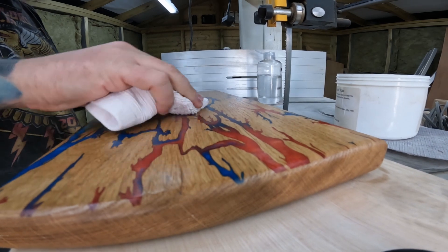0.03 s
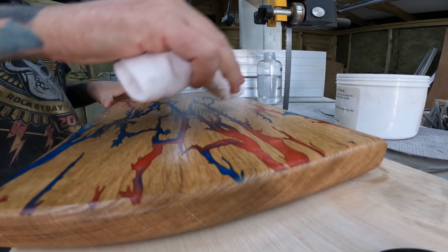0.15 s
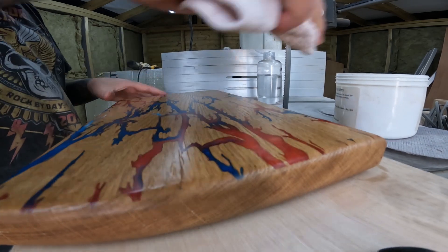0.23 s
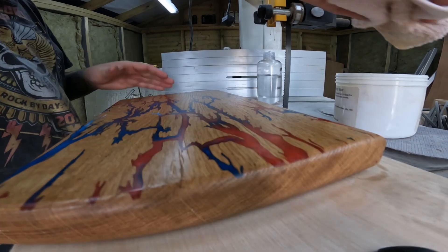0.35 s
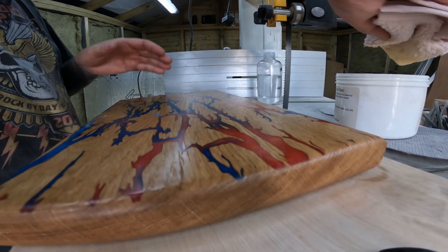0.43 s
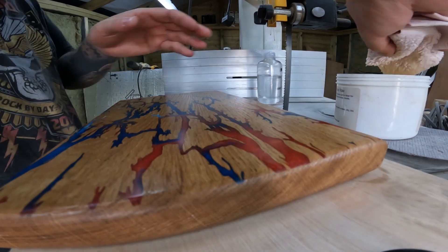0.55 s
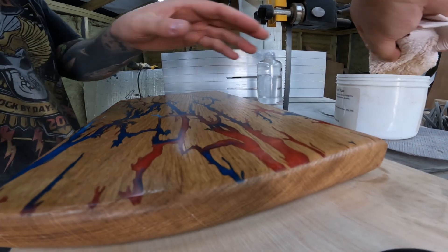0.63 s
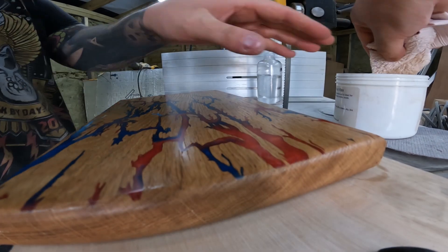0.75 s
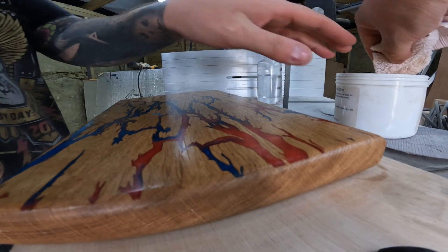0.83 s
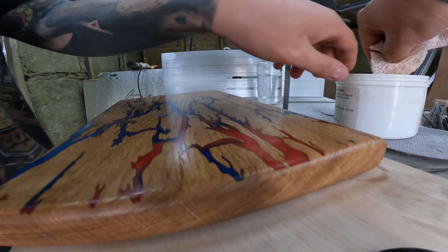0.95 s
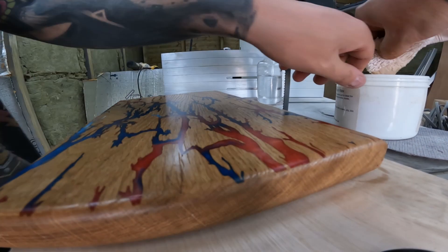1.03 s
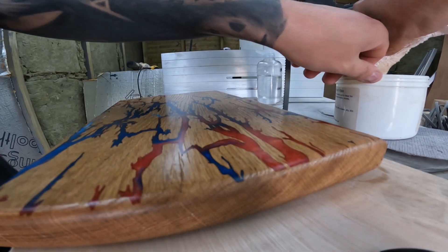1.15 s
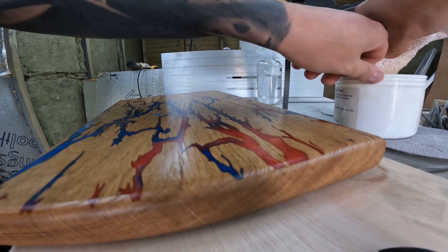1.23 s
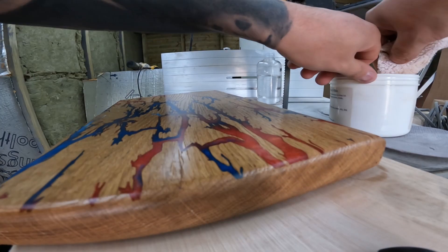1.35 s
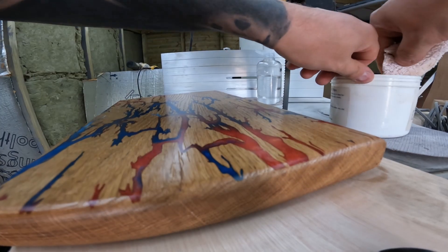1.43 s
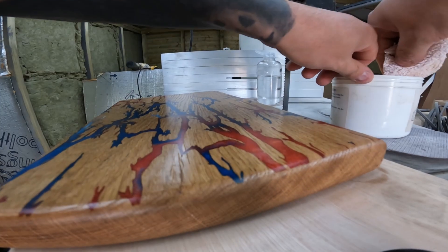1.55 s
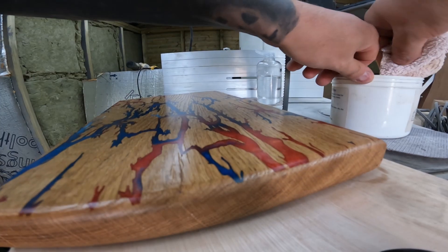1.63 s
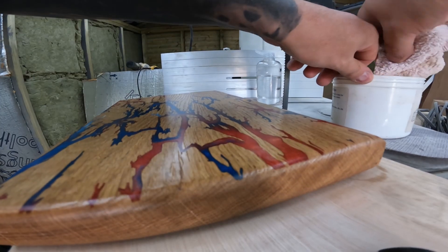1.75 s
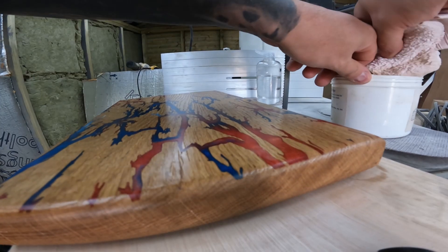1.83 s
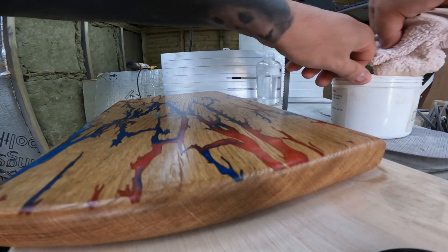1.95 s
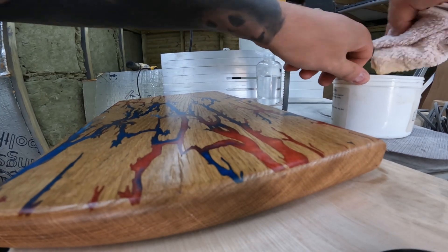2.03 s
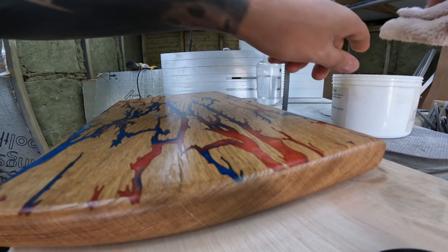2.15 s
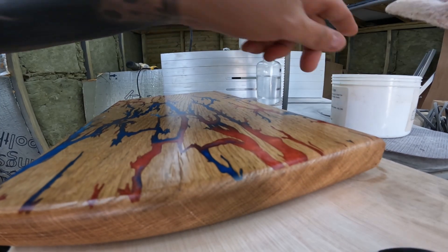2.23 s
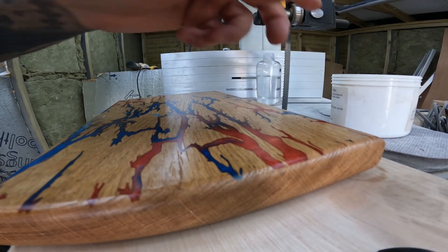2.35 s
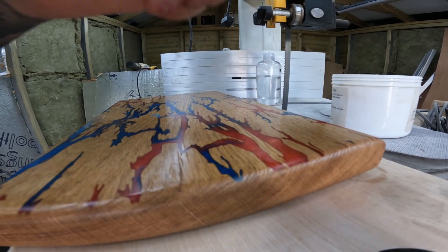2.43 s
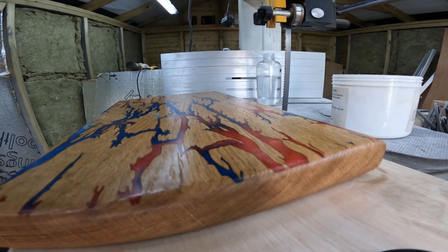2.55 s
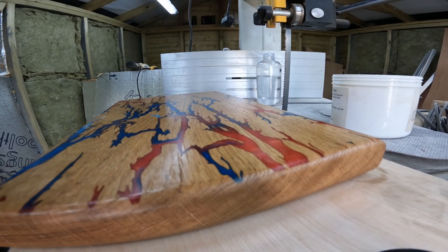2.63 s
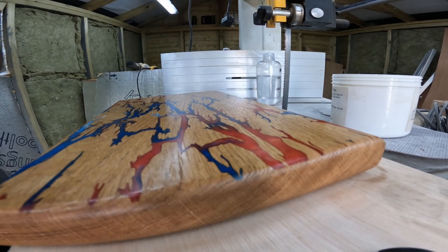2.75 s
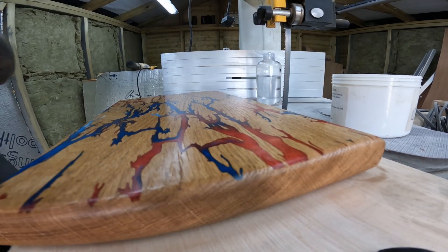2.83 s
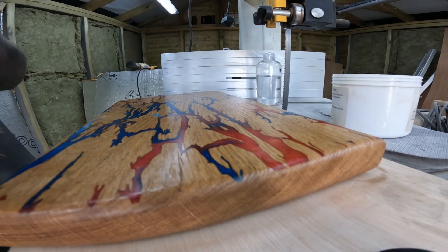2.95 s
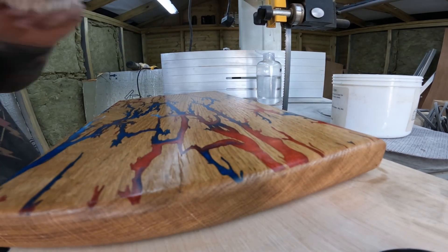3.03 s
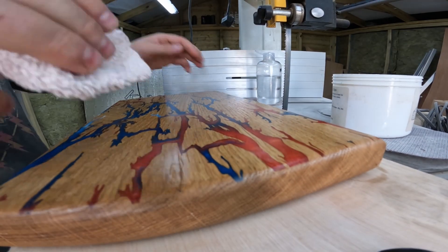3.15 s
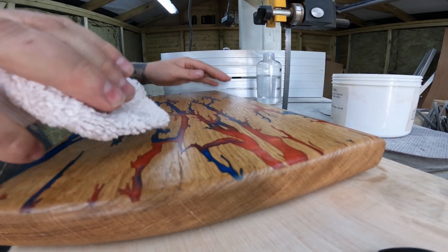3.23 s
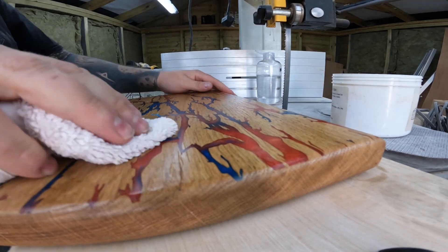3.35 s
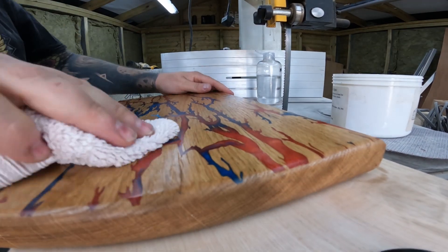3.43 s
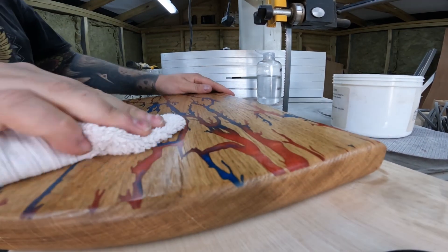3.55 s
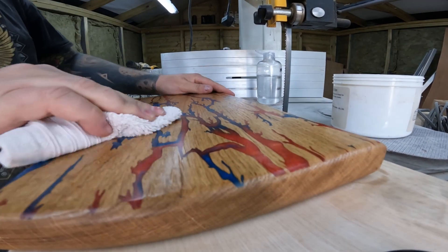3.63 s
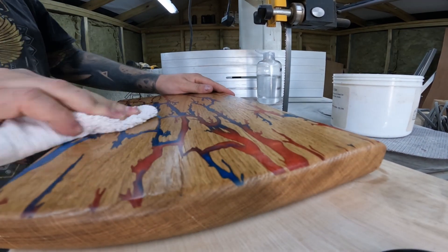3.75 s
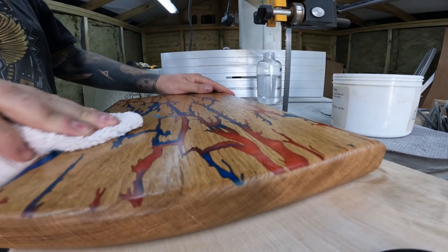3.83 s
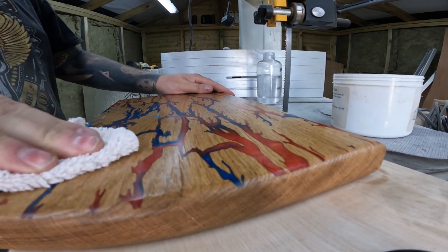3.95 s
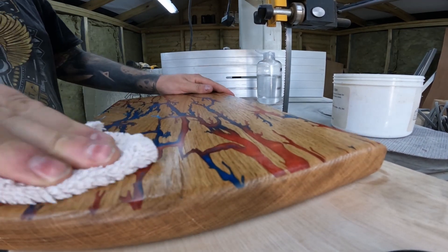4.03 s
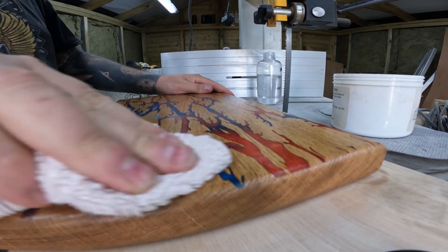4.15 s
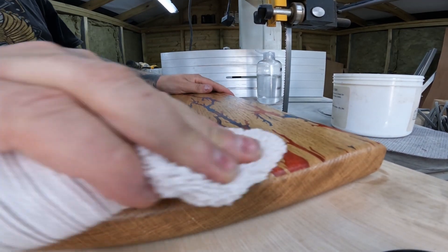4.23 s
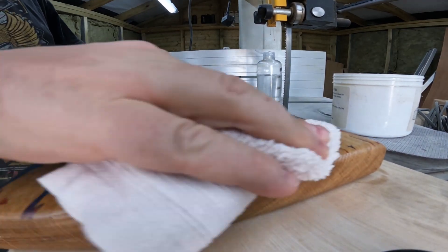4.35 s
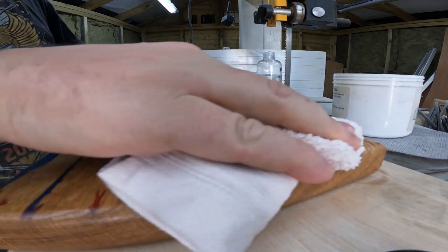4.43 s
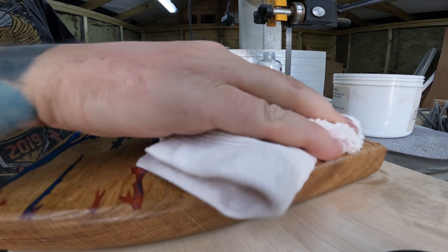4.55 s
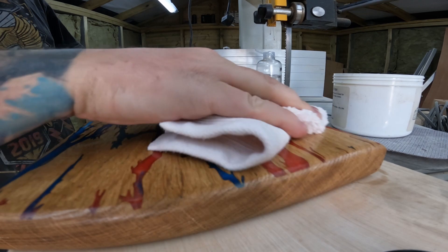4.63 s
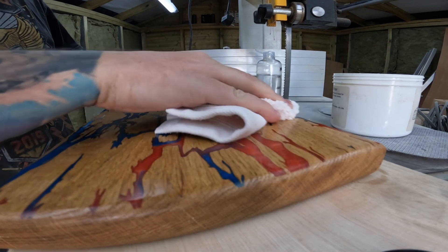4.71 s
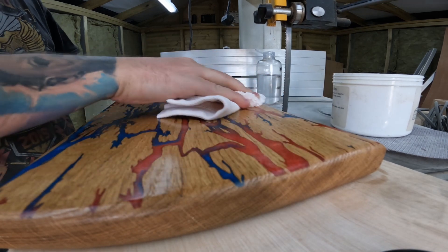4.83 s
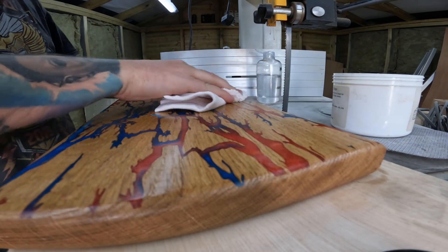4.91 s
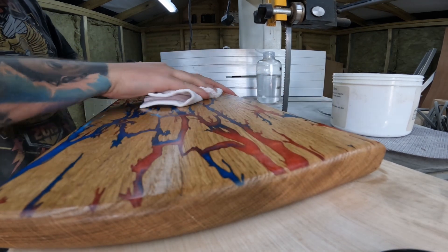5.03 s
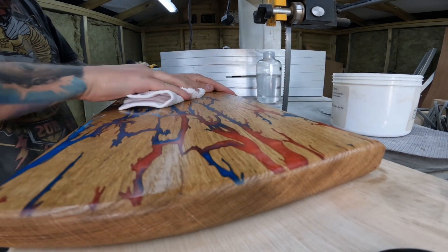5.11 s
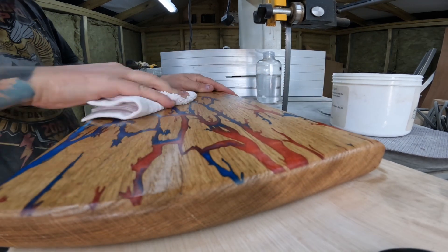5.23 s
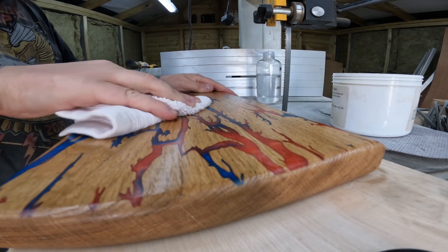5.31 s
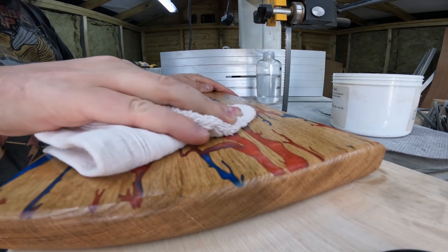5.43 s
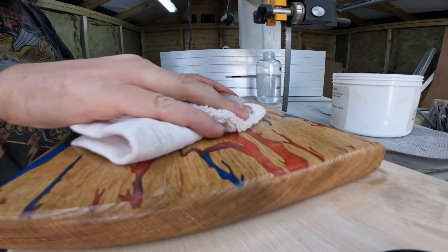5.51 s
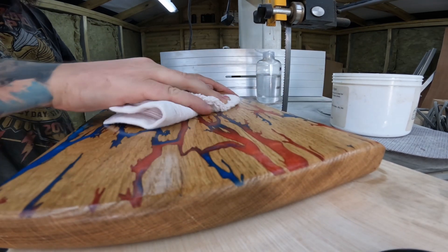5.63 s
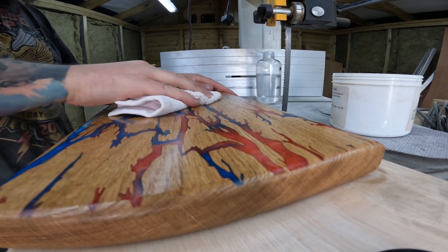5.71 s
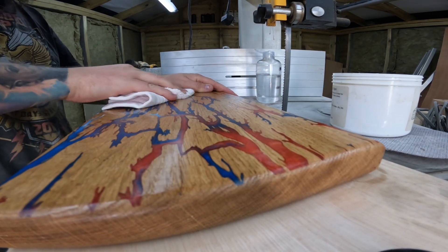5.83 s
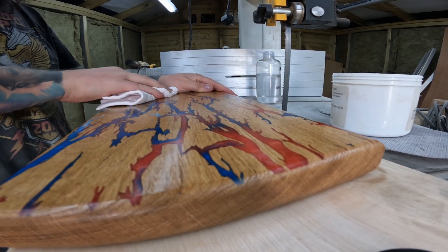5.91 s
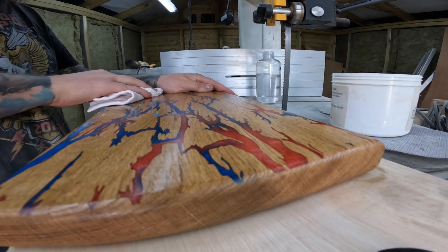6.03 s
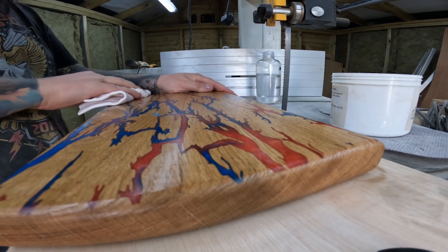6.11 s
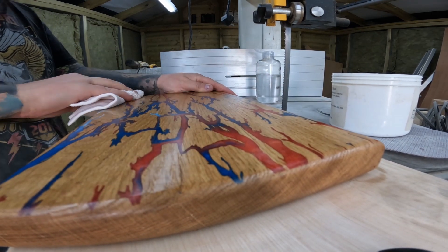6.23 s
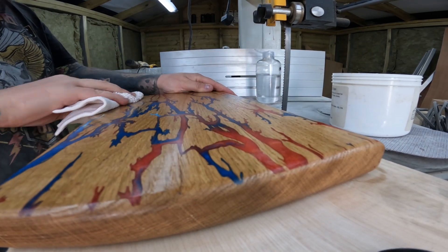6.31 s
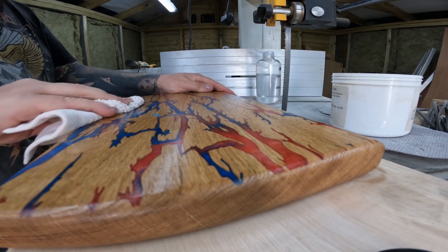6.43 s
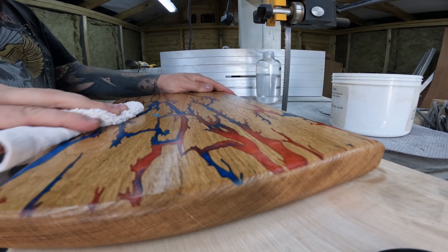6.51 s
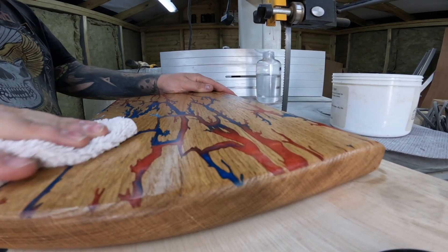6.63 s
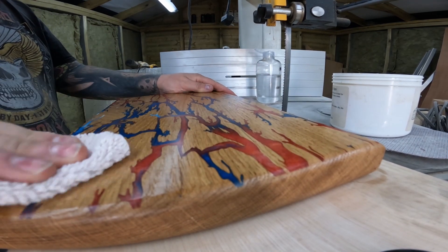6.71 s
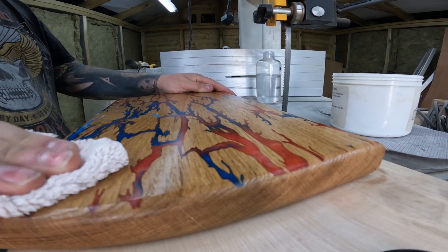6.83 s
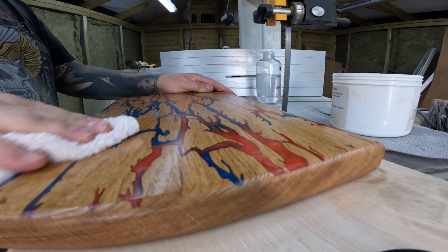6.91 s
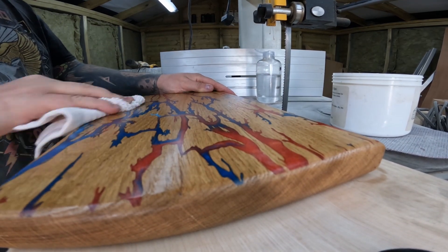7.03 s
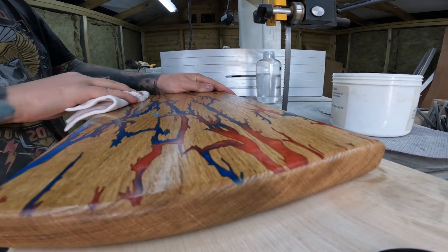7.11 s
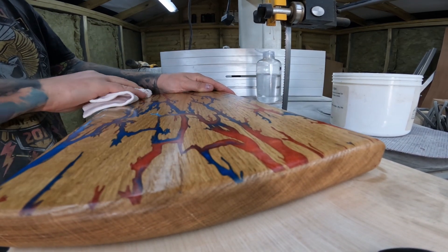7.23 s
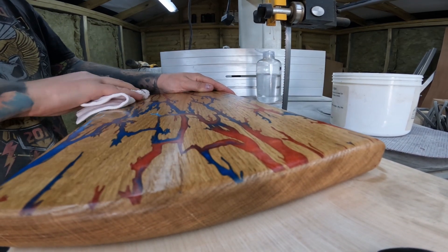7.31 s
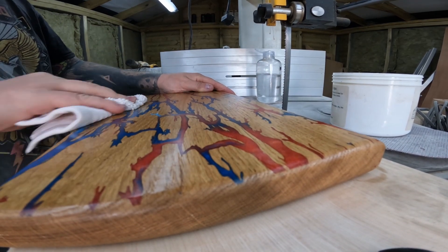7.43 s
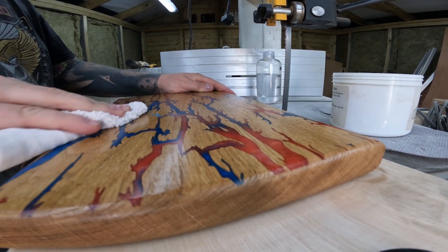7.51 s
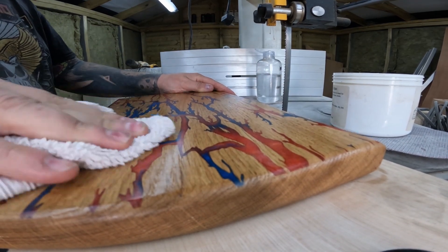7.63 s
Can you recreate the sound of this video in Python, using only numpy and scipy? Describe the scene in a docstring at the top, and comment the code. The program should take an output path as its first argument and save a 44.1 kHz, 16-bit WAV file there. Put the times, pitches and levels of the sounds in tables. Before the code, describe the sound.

Low foot scuffs and faint scrapes in a plastic tub, then close, airy cloth rubbing on wood with soft thumps and light knocks.

```python
"""A terry cloth polishes a wooden board: tiny slips of its fibres hiss and drive the modes of board and bench.
Between strokes it scuffs in a plastic wax tub, where friction noise rings the resonances of the tub.
Feet judder and scrape, fabric swishes and rasps, sharp ticks crack, and light knocks and thumps ring modes.
Sparse early echoes spread the sound diffusely in stereo, over room tone and a low rumble of the bench."""
import sys
import numpy as np
from scipy import signal
from scipy.fft import rfft, irfft, next_fast_len
from scipy.io import wavfile
from scipy.ndimage import map_coordinates

SR = 44100
rng = np.random.default_rng(int(sys.argv[2]) if len(sys.argv) > 2 else 0)


def digitize_waveform(pressure):
    """Quantize a signal to 16-bit integers and store it at the path in sys.argv[1].

    Rows of a 2-D input are taken as channels; values are limited to [-1, 1].
    """
    field = np.atleast_2d(pressure).T
    bounded = np.clip(field, -1, 1)
    quanta = np.round(bounded * 32767).astype(np.int16)
    wavfile.write(sys.argv[1], SR, quanta)


N = 338247
TIME = np.arange(N) / SR
TAPS = 4096  # length of every colouring filter in samples
HZ = np.fft.rfftfreq(TAPS, 1 / SR)

# Strokes of the cloth over the board. Each row: time of full speed in seconds, rise in seconds,
# fall in seconds, relative fibre hiss in dB, relative board tone in dB.
STROKES = [(0.11, 0.75, 0.075, -54, -57), (3.455, 0.022, 0.095, -47.5, -43),
           (3.68, 0.063, 0.17, -45.5, -50.5), (4.24, 0.18, 0.13, -40.5, -79),
           (4.385, 0.093, 0.11, -46, -42), (4.7, 0.31, 0.17, -44, -45), (5.12, 0.19, 0.11, -47, -50),
           (5.55, 0.14, 0.26, -44, -51.5), (5.9, 0.18, 0.32, -51.5, -66.5), (6.62, 0.16, 0.046, -50, -76),
           (6.893, 0.21, 0.0026, -44, -60.5), (6.962, 0.011, 0.2, -43.5, -55.5),
           (7.65, 0.13, .1, -45.5, -61)]
STROKE_CURVE = 1.445  # shape of a swell: 1 is pointed, 2 a bell

# Hiss spectrum of the terry fibres. Each row: frequency in Hz, relative density in dB per Hz.
FIBRES = [(550, -43), (900, -25.5), (1300, -15.5), (2170, -11), (2800, -5), (3800, -6.5), (5000, -2.5),
          (6300, -0.5), (7300, -2.5), (8300, -9), (9300, -12.5), (10700, -10.5), (12200, -16),
          (14000, -24.5), (15500, -38)]

# Path of the hand over the board. Each row: time in seconds, left over right in dB,
# extra delay of the glancing sound in ms (each side scales it), its strength from 0 to 1.
HAND = [(0.2, 0.5, .2, 0), (3.42, 6, 0.26, 0.3), (3.75, 2, 0.25, 0), (4.05, 4.5, 0.16, 0.02),
        (4.28, 3, .12, 0.36), (4.6, -1.5, 0.077, 0.38), (4.85, -1.5, .11, 0.3), (5.298, 1.5, 0.11, 0.08),
        (5.7, 0, .12, 0.15), (6.3, 3, 0.21, 0), (6.9, 4.7, 0.32, 0.02), (7.35, 2, .36, 0),
        (7.67, 3.7, 0.13, 0.12)]


def gain_of(db):
    """Level to amplitude: 20 dB is a factor of ten."""
    return 10 ** (np.asarray(db) / 20)


def evened(x):
    """Normalisation of a signal to an rms of 1."""
    return x / np.sqrt(np.mean(x ** 2) + 1e-20)


def shape(points):
    """Spectral envelope: levels interpolated in dB over log frequency."""
    hz, db = np.transpose(points)
    return gain_of(np.interp(np.log(HZ + 1), np.log(hz + 1), db))


def peaks(modes):
    """Modal response: the powers of separate resonances add; widths are at half amplitude."""
    power = sum((gain_of(db) / (1 + ((HZ - hz) / width * 2) ** 2)) ** 2 for hz, width, db in modes)
    return np.sqrt(power)


def colour(x, gain):
    """Minimum-phase filtering: a causal body rings only after it is struck."""
    log_gain = np.log(np.maximum(gain, 1e-5))
    circle = np.concatenate([log_gain, log_gain[-2:0:-1]])
    # the Hilbert transform of the log gain yields the minimum phase
    ring = np.fft.ifft(np.exp(np.conj(signal.hilbert(circle)))).real
    return signal.oaconvolve(x, ring)[:N]


def level(events, order, curve):
    """Incoherent addition: events swell and die away at the dB of column order, and their powers add."""
    t = TIME[::32]
    power = 0
    for row in events:
        peak_s, rise_s, fall_s = row[:3]
        distance = np.maximum(peak_s - t, 0) / rise_s + np.maximum(t - peak_s, 0) / fall_s
        power = power + gain_of(row[order]) ** 2 * np.exp(-distance ** curve)
    return np.interp(TIME, t, np.sqrt(power))


def wander(per_s):
    """Low-passed noise of rms 1: a slow random modulation that loses what is faster than per_s Hz."""
    spectrum = rfft(rng.standard_normal(N))
    rate = np.fft.rfftfreq(N, 1 / SR)
    return evened(irfft(spectrum / (1 + (rate / per_s) ** 4), N))


def friction(gain, slips_per_s, spread_db, smooth):
    """Stick-slip friction: random slips of uneven size, over a blur of finer ones, excite a body; rms 1."""
    size = gain_of(spread_db * np.minimum(rng.exponential(1, N), 5)) * rng.choice([-1, 1], N)
    slips = evened(size * (rng.random(N) < slips_per_s / SR))
    return evened(colour(slips + smooth * rng.standard_normal(N), gain))


def resonate(x, hz, width):
    """Heterodyne resonator: shifting the moving pitch hz to zero makes a low-pass follow it."""
    turn = np.exp(2j * np.pi * np.cumsum(hz) / SR)
    r = np.exp(-np.pi * width / SR)
    return 2 * (turn * signal.lfilter([1 - r], [1, -r], x / turn)).real


def place(x, pan_db):
    """Interaural level difference: left stands pan_db above right."""
    return np.array([x * gain_of(pan_db / 2), x * gain_of(-pan_db / 2)])


def add(mix, s, sound):
    """Superposition of a sound on the mix from time s."""
    part = mix[round(s * SR):][:len(sound)]
    part += sound[:len(part)]


def background():
    """Partly coherent room noise, and a low rumble that grows when the bench is rubbed or rocked."""
    # Room tone. Each row: frequency in Hz, relative density in dB per Hz.
    room_tone = [(20, 12), (55, 3), (90, -14.5), (170, 1), (280, -2), (420, -10), (750, -19), (1350, -7),
                 (2200, -20), (4000, -20.5), (6500, -18), (8400, -29), (12300, -28), (15000, -51)]
    # Dull rumble of the bench. Each row: frequency in Hz, relative density in dB per Hz.
    rumble_colour = [(10, -11.5), (26, 2), (50, -1), (62, -7), (76, -23.5), (200, -59)]
    # The bench rocks as weight shifts. Each row: time of the peak, rise and fall in seconds, level in dB.
    rocks = [(0.03, .05, 0.093, -51), (2.76, .04, 0.06, -52.5), (3.56, 0.05, 0.17, -42.5),
             (5.6, 0.3, 0.13, -54.5), (6.94, 0.036, 0.034, -48), (7.46, 0.047, 0.045, -48.5)]
    shared, left, right = (evened(colour(rng.standard_normal(N), shape(room_tone))) for _ in range(3))
    tone = gain_of(-64) * (shared + 1.33 * np.array([left, right]))
    at_rest = gain_of(-66)
    rubbed = gain_of(-18.5) * level(STROKES, order=3, curve=STROKE_CURVE)
    rocked = level(rocks, order=3, curve=1.46)
    shake = np.sqrt(at_rest ** 2 + rubbed ** 2 + rocked ** 2)
    rumble = shake * evened(colour(rng.standard_normal(N), shape(rumble_colour)))
    return tone + place(rumble, -1.05)


def reflections(x, t60=0.065):
    """Early reflections: sparse echoes from the bench and close walls decay by 60 dB in t60 seconds."""
    t = TIME[:SR // 3]
    sparse = rng.choice([-1, 1], len(t)) * (rng.random(len(t)) < 3000 / SR)
    taps = sparse * (t > .002) * gain_of(-60 * t / t60)
    return signal.oaconvolve(x, taps / np.linalg.norm(taps))[:N]


def diffuse_spread(x, count=24):
    """Decorrelation: echo patterns differ by side and crossfade over time, which avoids fixed comb lines."""
    # Diffuse stereo spread by frequency, widest in the top octave. Each row: frequency in Hz, gain in dB.
    spread = [(60, -24), (160, -17), (550, -7), (1200, -12), (2000, -8), (3800, -7), (6300, -11.5),
              (8500, -8), (10700, -11), (12200, -4), (13500, -5), (15000, -1)]
    spot = TIME / TIME[-1] * (count - 1)
    spots = np.arange(count)
    # equal-power crossfade from each echo pattern to the next
    shares = np.sqrt(np.maximum(1 - abs(spot - spots[:, None]), 0))
    out = np.zeros((2, N))
    for side in range(2):
        for share in shares:
            heard = np.flatnonzero(share)
            add(out[side], TIME[heard[0]], reflections(x[side, heard] * share[heard]))
    return np.array([colour(side, shape(spread)) for side in out])


def ticks(crack_s=0.00015):
    """Impulsive excitation: a crack of a few cycles peaks early, with a faint noisy rattle after it."""
    # Small sharp ticks. Each row: start in seconds, relative level in dB, pitch in Hz.
    tick_rows = [(0.5793, -29, 6300), (1.8603, -38, 3240), (1.896, -41, 3200), (2.182, -45, 5500),
                 (3.3576, -34.5, 6030), (3.755, -34, 5930), (7.0265, -29, 6900)]
    out, t = np.zeros(N), TIME[:SR // 20]
    band = signal.butter(2, [1000, 7000], "band", fs=SR)
    for s, db, hz in tick_rows:
        pulse = t / crack_s * np.exp(1 - t / crack_s)
        crack = pulse * (np.sin(2 * np.pi * hz * t) + 0.51 * np.sin(np.pi * hz * t))
        rattle = np.exp(-t / 0.0032) * signal.lfilter(*band, rng.standard_normal(len(t)))
        add(out, s, gain_of(db) * (crack + 0.4 * rattle))
    return place(out, 0.66)


def swishing():
    """Fabric friction: each swish swells and fades as hiss, the rasp of the weave and a soft thud."""
    # Fabric swishes and rasps, from moving arms and from the rubbing cloth. Each row: middle in seconds,
    # half length in seconds, relative hiss in dB, relative rasp in dB, rasp pitch in Hz, relative thud in dB.
    swishes = [(0.283, 0.08, -76, -73, 5000, -95), (1.118, 0.015, -52, -57, 6500, -88),
               (1.882, 0.023, -64, -64, 3260, -70), (2.088, 0.029, -83, -69, 9600, -83),
               (2.752, 0.025, -48.5, -53.5, 2800, -54.5), (2.828, 0.019, -53.5, -51, 2830, -60),
               (2.924, 0.044, -60.5, -58.5, 2880, -67), (3, 0.032, -52.5, -58, 2820, -58),
               (3.09, 0.038, -63, -57.5, 1450, -59), (3.352, 0.019, -52, -51.5, 1490, -74),
               (3.648, 0.055, -65, -50.5, 2640, -78), (6.307, 0.08, -68.5, -62.5, 2700, -80),
               (6.96, 0.029, -54.5, -53, 2170, -74)]
    # Fabric hiss. Each row: frequency in Hz, relative density in dB per Hz.
    fabric = [(400, -21), (800, -27), (1020, -5), (1280, -3.5), (2130, -13), (2900, -5), (3900, -12),
              (5200, -9), (7000, -10.5), (8600, -21), (10800, -21), (12500, -27.5), (15500, -41)]
    # A soft push of fabric. Each row: frequency in Hz, relative density in dB per Hz.
    thud_colour = [(30, -30), (80, -22), (140, 2.5), (260, 1), (480, -2.5), (750, -7), (1500, -38)]
    hiss = friction(shape(fabric), 3000, 1.2, 0.88)
    thud = friction(shape(thud_colour), 600, 1.5, 0.41)
    out = np.zeros(N)
    for s, half, hiss_db, rasp_db, rasp_hz, thud_db in swishes:
        rasp = friction(peaks([(rasp_hz, 900, 0)]), 3000, 4, 0.71)
        swell = np.exp(-.5 * abs((TIME - s) / half) ** 2.45)
        out += swell * (gain_of(hiss_db) * hiss + gain_of(rasp_db) * rasp + gain_of(thud_db) * thud)
    return place(out, 3.5)


def shuffling(width_hz=190, sag_hz_per_s=310):
    """Stick-slip of a dragged sole: its judder falls in pitch as the drag runs out, over a gritty scrape."""
    # Feet shuffling on the floor. Each row: time of the peak in seconds, rise in seconds, fall in seconds,
    # relative low judder in dB, relative gritty scrape in dB, judder pitch at the peak in Hz.
    shuffles = [(0.705, 0.041, 0.066, -39.5, -47.5, 192), (0.865, 0.038, .03, -42, -53.5, 212),
                (0.978, 0.032, 0.023, -47, -66, 171), (1.33, 0.044, 0.068, -55, -61, 193),
                (1.47, 0.039, .06, -50.5, -60, 217), (2.632, 0.036, 0.033, -51, -56, 206)]
    # Scrape over grit. Each row: frequency in Hz, relative density in dB per Hz.
    grit_colour = [(200, -19), (360, 7), (500, -0.5), (730, -6.5), (1080, -1.5), (1400, -3.5), (2000, -11),
                   (2800, -9.5), (4200, -17.5), (6500, -19), (9000, -30), (15000, -44)]
    curve = 1.53
    s, *_, peak_hz = np.transpose(shuffles)
    nearest = np.searchsorted((s[1:] + s[:-1]) / 2, TIME)
    hz = peak_hz[nearest] - sag_hz_per_s * np.clip(TIME - s[nearest], -.12, .12)
    slips = resonate(resonate(rng.standard_normal(N), hz, width_hz), hz, width_hz)
    # the floor passes only the low part of the judder
    slips = signal.lfilter(*signal.butter(2, [60, 230], "band", fs=SR), slips)
    # stick and slip settles to a steadier swing than a free ring would
    swing = abs(signal.hilbert(evened(slips), next_fast_len(N)))[:N]
    steadied = evened(slips / (swing + 1.3))
    judder = level(shuffles, order=3, curve=curve) * gain_of(-0.6) * steadied
    scrape = friction(shape(grit_colour), 1500, 0.6, 0.68)
    grit = level(shuffles, order=4, curve=curve) * gain_of(4.0) * scrape
    return place(judder, 0.3) + place(grit, 3.3)


def scooping():
    """Cavity resonance: the cloth drags unevenly through wax, and the hollow plastic tub colours it."""
    # Scuffs of the cloth in the wax tub. Each row: time of the peak in seconds, rise in seconds,
    # fall in seconds, relative tub tone in dB, relative fibre hiss in dB.
    scoops = [(1.18, 0.019, 0.013, -62, -71), (1.26, .018, 0.009, -58.5, -73),
              (1.46, 0.055, 0.089, -56, -63), (1.8, 0.088, 0.12, -63.5, -71),
              (2.01, 0.084, 0.066, -58.5, -64), (2.11, 0.025, 0.01, -74, -60.5),
              (2.38, 0.076, 0.11, -66, -72)]
    # Resonances of the tub. Each row: frequency in Hz, width in Hz, relative level in dB.
    tub_modes = [(1130, 110, -1), (1330, 630, -1), (2500, 3500, -17), (3170, 550, -10)]
    drag = wander(25)
    tub_level = level(scoops, order=3, curve=1.0) * gain_of(0.7 + 0.96 * drag)
    tub = tub_level * friction(peaks(tub_modes), 900, 3.8, 0.95)
    hiss_level = level(scoops, order=4, curve=1.0) * gain_of(0.7 + 2.5 * drag)
    hiss = hiss_level * friction(shape(FIBRES), 1500, 2.8, 0.89)
    return place(tub, -2.1) + place(hiss, -1.6)


def thumps():
    """Single-mode response: weight coming down sets board and floor swinging in one low decaying mode."""
    # Weight coming down. Each row: start in seconds, relative level in dB, pitch in Hz,
    # time to decay by 60 dB in seconds.
    thump_rows = [(2.742, -38, 70, 0.12), (3.494, -34, 71, 0.5)]
    out, t = np.zeros(N), TIME[:SR // 2]
    for s, db, hz, t60 in thump_rows:
        onset = 1 - np.exp(-t / 0.0054)
        add(out, s, gain_of(db - 60 * t / t60) * onset * np.sin(2 * np.pi * hz * t))
    return place(out, .2)


def knocks(contact_s=0.00027):
    """Modal excitation: each blow lands on another spot, so the modes ring in another mix."""
    # Light knocks on tub and board. Each row: start in seconds, relative peak level in dB.
    knock_rows = [(1.442, -35.5), (1.468, -40), (3.85, -37.5), (4.325, -29.5), (4.343, -30.5), (4.406, -30),
                  (4.423, -30), (5.575, -42.5)]
    # Modes of a knock. Each row: frequency in Hz, mean relative level in dB, 60 dB decay time in seconds.
    knock_modes = [(234, -15, 0.059), (650, -7, 0.048), (873, -18, 0.098), (1021, 7, 0.036),
                   (1270, 7.5, 0.014), (1620, -48, .03), (2730, -29, 0.018)]
    out, t = np.zeros(N), TIME[:SR // 5]
    for s, db in knock_rows:
        ring = 0
        for hz, mode_db, t60 in knock_modes:
            decay = gain_of(mode_db + 2 * rng.standard_normal() - 60 * t / t60)
            ring = ring + decay * np.sin(2 * np.pi * (hz * t + rng.random()))
        ring = ring * (1 - np.exp(-t / contact_s))  # cloth cushions each blow
        add(out, s, gain_of(db) * ring / abs(ring).max())
    return place(out, 2.2)


def glance(x, path=1):
    """Comb filtering: a delayed reflection off the board cuts notches that slide with the hand."""
    s, _, delay_ms, strength = np.transpose(HAND)
    delay_s = path * np.interp(TIME, s, delay_ms) / 1000
    strength = np.interp(TIME, s, strength)
    reflection = map_coordinates(x, [(TIME - delay_s) * SR])
    return (x + strength * reflection) / np.sqrt(1 + strength ** 2)


def polishing():
    """Friction-driven modes: cloth loops catch on the waxed wood, and pressure drives board and bench."""
    # The cloth almost sticks at a slow turn. Each row: middle in seconds, length in seconds, hiss dip in dB.
    sticks = [(7.36, 0.033, 12)]
    # The hand leans on the board. Each row: time of the hardest push in seconds, rise in seconds,
    # fall in seconds, relative level in dB.
    presses = [(3.54, 0.065, 0.059, -39), (3.85, 0.14, 0.1, -59.5), (4.04, .012, 0.012, -60),
               (4.48, 0.2, 0.19, -54), (5.62, 0.076, 0.11, -55.5), (5.87, 0.1, 0.051, -57),
               (6.98, 0.062, .08, -70), (7.55, 0.28, 0.32, -67)]
    # Board resonances under rubbing. Each row: frequency in Hz, width in Hz, relative level in dB.
    board_modes = [(717, 74, -24), (1038, 220, 1.5), (1314, 580, 4.5), (1670, 620, -2.5),
                   (2230, 1200, -5.5), (2840, 1100, -3.5), (3480, 870, -7.5)]
    # Bench resonances. Each row: frequency in Hz, width in Hz, relative level in dB.
    bench_modes = [(122, 32, -6), (163, 43, 1), (217, 44, 2.5), (268, 55, 0)]
    # Hollow notes of the board under a push. Each row: frequency in Hz, width in Hz, relative level in dB.
    hollow_modes = [(363, 56, 1.5), (456, 110, -2), (617, 290, -5.5)]
    grip = wander(17.4)
    stuck_db = sum(depth * np.exp(-((TIME - s) / length * 2) ** 4) for s, length, depth in sticks)
    hiss_level = level(STROKES, order=3, curve=STROKE_CURVE) * gain_of(1.5 + 0.72 * grip - stuck_db)
    hiss = hiss_level * friction(shape(FIBRES), 4500, 1.2, 0.99)
    board_level = level(STROKES, order=4, curve=1.6) * gain_of(-0.4 + 0.74 * grip)
    board = board_level * friction(peaks(board_modes), 1500, 1.66, 0.87)
    push = level(presses, order=3, curve=1.94) * gain_of(2.2 * grip)
    thrum = push * gain_of(1.9) * friction(peaks(bench_modes), 500, 2.0, 1.0)
    # the hollow notes grow with the push, but level off as the heavy hand damps them
    damped_push = push / (1 + push / gain_of(-38))
    hollow = gain_of(-4.0) * damped_push * friction(peaks(hollow_modes), 800, 4, 1.0)
    s, pan_db, *_ = np.transpose(HAND)
    pan_db = np.interp(TIME, s, pan_db)
    left, right = place(hiss, pan_db)
    glancing = np.array([glance(left, 0.94), glance(right, 0.99)])
    return glancing + place(board + hollow, pan_db + .5) + place(thrum, 0.17)


def scene():
    """Direct-to-diffuse balance: polishing is close and dry, the other handling farther off."""
    near = polishing() + knocks() + thumps() + ticks()
    far = scooping() + shuffling() + swishing()
    direct = gain_of(-0.17) * near + gain_of(-0.3) * far
    return direct + diffuse_spread(near + gain_of(3.5) * far) + background()


def record(dry):
    """Transducer response: two microphone ports differ in level and phase, ahead of a band limit."""
    # Left port against the right. Each row: frequency in Hz, extra level in dB, phase lag in radians.
    left_port = [(150, .1, 0), (700, 1, 0), (1900, 0, .5), (3700, 0, .45), (6000, -1.4, .15),
                 (7500, .8, .15), (9300, 1, .05), (10800, -.4, 0), (12100, 4, -.2), (13400, -1.5, 0),
                 (15000, 3.5, .8)]
    edge_hz = 15650
    size = next_fast_len(N + TAPS)
    port_hz, port_db, port_lag = np.transpose(left_port)
    hz = np.fft.rfftfreq(size, 1 / SR)
    tilt = gain_of(np.interp(hz, port_hz, port_db) / 2)
    lag = np.exp(-1j * np.interp(hz, port_hz, port_lag))
    ports = np.array([tilt * lag, 1 / tilt])
    heard = irfft(rfft(dry, size) * ports, size)[:, :N]
    low_pass = signal.firwin(511, edge_hz, window=("kaiser", 9), fs=SR)
    return signal.oaconvolve(heard, low_pass[None], "same")


dry = scene()
out = record(dry)
digitize_waveform(out)
```